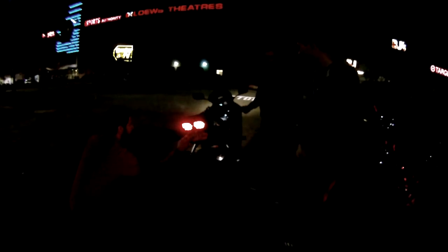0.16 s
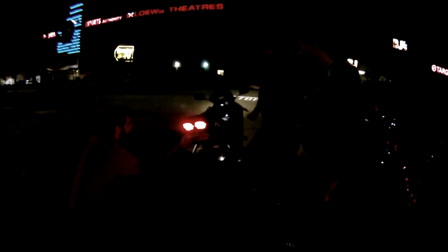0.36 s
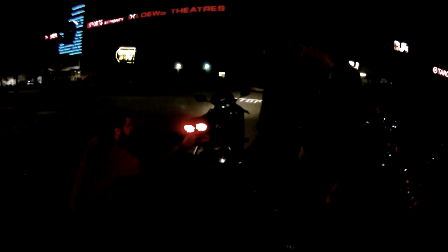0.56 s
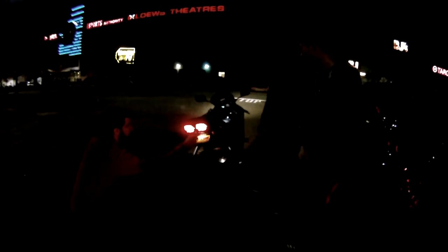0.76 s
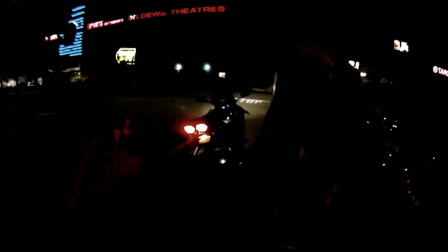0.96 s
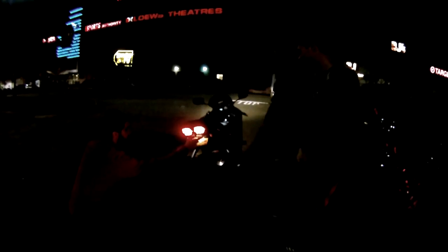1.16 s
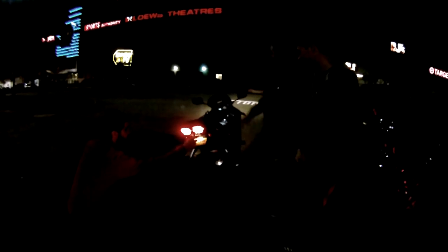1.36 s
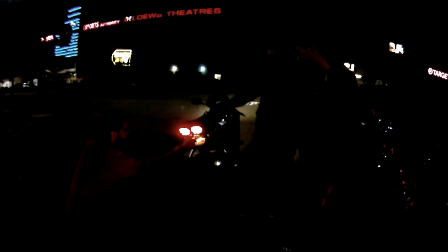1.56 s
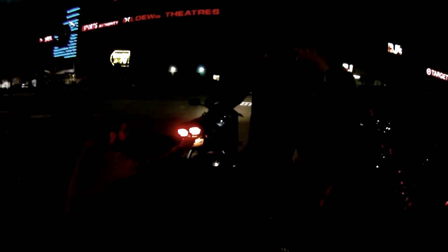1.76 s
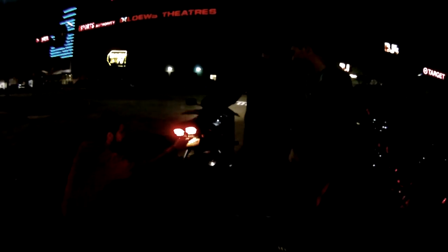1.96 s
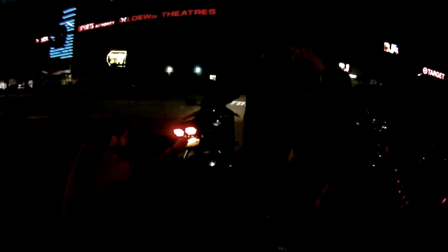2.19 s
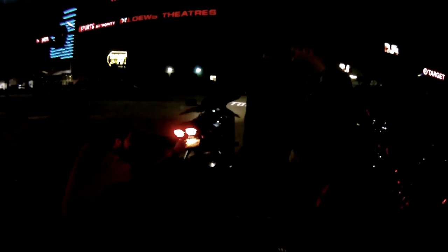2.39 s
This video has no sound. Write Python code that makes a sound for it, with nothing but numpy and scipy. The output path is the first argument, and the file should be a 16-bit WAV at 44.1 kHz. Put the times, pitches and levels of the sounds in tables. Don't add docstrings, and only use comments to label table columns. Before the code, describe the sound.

Motorcycle engines idling in an open car park at night, lumpy and popping, with brief switch clicks

```python
import sys
import numpy as np
from scipy import signal
from scipy.fft import rfft, irfft
from scipy.io import wavfile

SR = 44100
rng = np.random.default_rng(int(sys.argv[2]) if len(sys.argv) > 2 else 0)


def master(y):
    cut = np.clip(np.atleast_2d(y).T, -1, 1)
    pcm = np.round(cut * 32767)
    wavfile.write(sys.argv[1], SR, pcm.astype(np.int16))


def to_linear_factor(level_db):
    exponent = np.asarray(level_db, float) / 20
    return 10 ** exponent


N = 111573


def rms_one(x):
    return x / np.sqrt(np.mean(x ** 2) + 1e-20)


def noise():
    return rng.standard_normal(N)


def drift(rate_hz):
    r = np.exp(-2 * np.pi * rate_hz / SR)
    wander = signal.lfilter([1], [1, -2 * r, r * r], rng.standard_normal(N + SR))
    return rms_one(wander[SR:])


def train(times_s, level_db):
    out = np.full(N, 1e-18)
    place = np.clip((np.asarray(times_s) * SR).astype(int), 0, N - 1)
    np.add.at(out, place, to_linear_factor(np.asarray(level_db)))
    return out


def modes(knocks, table):
    out = 0
    for hz, db, t60_s in table:
        r, w = to_linear_factor(-60 / (t60_s * SR)), 2 * np.pi * hz / SR
        out = out + to_linear_factor(db) * signal.lfilter([0, np.sin(w)], [1, -2 * r * np.cos(w), r * r], knocks)
    return out


def resonance(x, hz, width_hz):
    r = np.exp(-np.pi * width_hz / SR)
    gain = (1 - r * r) / 2
    return signal.lfilter([gain, 0, -gain], [1, -2 * r * np.cos(2 * np.pi * hz / SR), r * r], x)


def coloured(spectrum):
    hz, db = np.transpose(spectrum)
    grid = np.fft.rfftfreq(N, 1 / SR) + 1
    gain = to_linear_factor(np.interp(np.log(grid), np.log(hz), db))
    return rms_one(irfft(rfft(noise()) * gain, N))


def puffs(knocks, decay_s):
    return signal.lfilter([1], [1, -np.exp(-1 / (decay_s * SR))], knocks)


def filtered(x, order, hz, kind="low"):
    return signal.sosfilt(signal.butter(order, hz, kind, fs=SR, output="sos"), x)


# columns f/Hz, level/dB per Hz
RUMBLE_SPECTRUM = [(20, -42), (35, -33), (60, 3), (130, -2), (200, -20.5), (420, -19.5), (560, -39.5),
                   (800, -41)]


def traffic():
    return to_linear_factor(-42.5) * coloured(RUMBLE_SPECTRUM)


# columns f/Hz, level/dB per Hz
HISS_SPECTRUM = [(310, -29), (520, -9), (1090, -5.5), (1440, -12), (2140, -2), (4910, -14), (5900, -22),
                 (7670, -69), (13000, -120)]
# columns f/Hz, width/Hz, level/dB
HISS_PEAKS = [(2134, 146, -51.5), (1898, 200, -55.5), (2476, 116, -57.5), (3405, 52, -66),
              (3740, 50, -68.5)]


def hiss(rasp, chuff):
    hiss_db = -53
    out = coloured(HISS_SPECTRUM) * to_linear_factor(0.4 * drift(27))
    for hz, width_hz, db in HISS_PEAKS:
        narrow = resonance(resonance(noise(), hz, width_hz), hz, 2 * width_hz)
        out = out + to_linear_factor(db - hiss_db + 2.0 * drift(38)) * rms_one(narrow)
    steady = to_linear_factor(hiss_db + 1.3 * drift(45))
    return out * np.sqrt(steady ** 2 + rasp ** 2 + chuff ** 2)


# t/s, length/s, level/dB, f/Hz
HAND_BRUSH = (.82, .16, -61, 1400)


def brush():
    start_s, length_s, db, hz = HAND_BRUSH
    progress = np.clip((np.arange(N) / SR - start_s) / length_s, 0, 1)
    rub = resonance(resonance(noise(), hz, 410), hz, 690)
    return to_linear_factor(db) * np.sin(np.pi * progress) * rms_one(rub)


# columns t/s, level/dB, f/Hz, rise/s
SWITCH_CLICKS = [(.9150, -31, 2200, .002), (.9190, -23, 2200, .0008), (.9196, -27.5, 3500, .0009),
                 (.9500, -38, 2200, .002), (1.1010, -32.5, 2150, .001), (1.1335, -31.5, 2150, .002),
                 (1.1532, -29, 1450, .00035), (1.1534, -32, 2300, .0004), (1.1728, -30, 1450, .00035),
                 (1.1733, -33, 2400, .0005), (1.439, -37, 2300, .0012)]
# columns f/Hz, level/dB, t60/s
HOUSING = [(1250, -38, .03), (1700, -27, .016), (2550, -29, .016), (3300, -33, .035), (3750, -34, .035)]


def switch():
    out, t = 0, np.arange(N) / SR
    for start_s, db, hz, rise_s in SWITCH_CLICKS:
        u = np.clip((t - start_s) / rise_s, 0, 40)
        tone = np.sin(2 * np.pi * hz * (t - start_s))
        grit = rms_one(resonance(noise(), hz, hz))
        out = out + to_linear_factor(db) * u * np.exp(1 - u) * (tone + 0.35 * grit)
    loudest_s, snap_s, second_snap_s = SWITCH_CLICKS[1][0] + .001, SWITCH_CLICKS[6][0], SWITCH_CLICKS[8][0]
    out = out + modes(train([loudest_s, snap_s, second_snap_s], [0, -14, -13]), HOUSING)
    return filtered(out, 3, [800, 4300], "band")


# columns t/s, level/dB
VALVE_TICKS = [(0.075, -45), (0.162, -47), (0.253, -40), (0.339, -46), (0.431, -41), (0.53, -43),
               (0.622, -41), (0.718, -43), (0.816, -41), (0.912, -42), (1.003, -43), (1.098, -42),
               (1.186, -43), (1.281, -39.5), (1.37, -43.5), (1.461, -40.5), (1.551, -47), (1.645, -41),
               (1.739, -42.5), (1.835, -40.5), (1.931, -43), (2.029, -42), (2.129, -42), (2.224, -39.5),
               (2.318, -42.5), (2.416, -39.5), (2.507, -43)]
# columns f/Hz, level/dB, t60/s
VALVE_COVER = [
    (964, -7, 0.046),
    (1062.5, -3.5, 0.034),
    (1199, -10, 0.074),
]
# columns f/Hz, level/dB, t60/s
TWIN_PIPE = [
    (55, -34.5, 0.059),
    (92, -54, .1),
    (125.5, -40, 0.14),
    (177.3, -50.5, 0.48),
    (214.9, -55, 0.26),
]
# columns t/s, level/dB
HARD_FIRINGS = [
    (0.111, 2.5),
    (.292, 2),
    (0.758, -2),
    (0.952, 2),
    (1.319, 2),
    (1.687, 3),
    (1.876, 1),
    (2.069, -2),
    (2.454, 4),
]


def twin():
    second_firing, second_db, spread_db = 0.41, -3, 1
    ticks_s, tick_db = np.transpose(VALVE_TICKS)
    cycle_s = np.gradient(ticks_s)
    before_s = ticks_s[:1] - (1 - second_firing) * cycle_s[0]
    times = np.concatenate([ticks_s, ticks_s + second_firing * cycle_s, before_s])
    is_second = np.arange(len(times)) >= len(ticks_s)
    power_db = second_db * is_second + spread_db * rng.standard_normal(len(times))
    inside = times < N / SR
    hard = train(*np.transpose(HARD_FIRINGS))
    fire = train(times[inside], power_db[inside]) + 0.5 * hard

    spit_swell = puffs(puffs(hard, 0.0065), 0.0035) / (0.0012 * SR)
    spit = to_linear_factor(-59) * spit_swell * rms_one(resonance(noise(), 4600, 3800))
    tick = 0
    for mode in VALVE_COVER:
        strike_s = ticks_s + rng.uniform(0, .0004, len(ticks_s))
        strike_db = tick_db + rng.normal(0, 1, len(ticks_s))
        tick = tick + modes(train(strike_s, strike_db), [mode])
    tick = to_linear_factor(-0.5) * resonance(tick, 1005, 480)
    exhaust = filtered(modes(fire, TWIN_PIPE), 2, 400)
    return exhaust + spit + tick, to_linear_factor(-62.5) * puffs(fire, 0.004)


# columns t/s, f/Hz
FOUR_SPEED = [(0.0, 64.56), (0.195, 69.01), (0.389, 69.97), (0.584, 71.34), (0.778, 73.75), (0.973, 72.72),
              (1.168, 74.83), (1.362, 73.4), (1.557, 72.6), (1.752, 74.78), (1.946, 76.39), (2.141, 75.84),
              (2.335, 74.84), (2.53, 76.42)]
# columns level/dB, spread/dB
CYLINDERS = [
    (-1.5, 1.5),
    (0, 1.2),
    (-1.5, 1.3),
    (-15, 3),
]
# columns f/Hz, level/dB, t60/s
FOUR_PIPE = [
    (79, -45.5, 0.038),
    (139.2, -43.5, 0.088),
    (296.7, -41.5, 0.057),
    (356, -40.5, 0.022),
    (439.4, -48.5, 0.044),
]
CATCHES = [0.161, 0.277, 0.449, 0.618, 0.783, 0.892, 1.056, 1.164, 1.271, 1.435, 1.599, 1.762, 1.92, 1.973,
           2.396, 2.449]
MISFIRES = [.058, .176, .292, .435, .52, .604, .632, .715, .824, .933, .974, 1.015, 1.043, 1.151, 1.285,
            1.394, 1.503, 1.613, 1.721, 1.881, 1.986, 2.091, 2.17, 2.197, 2.303, 2.515]


def four():
    jitter_s, catch_db, misfire_db = 0.00024, 16, -13
    t = np.arange(N) / SR
    phase = 0.28 + np.cumsum(np.interp(t, *np.transpose(FOUR_SPEED))) / SR
    k = np.arange(1, int(phase[-1]) + 1)
    fire_s = np.interp(k, phase, t)
    luck = rng.standard_normal((len(k), 2))
    level_db, spread_db = np.array(CYLINDERS)[k % 4].T
    for times, change_db in (CATCHES, catch_db), (MISFIRES, misfire_db):
        nearest = np.abs(fire_s - np.reshape(times, (-1, 1))).argmin(axis=1)
        level_db = level_db + change_db * np.isin(k, k[nearest])
    fire = train(fire_s + jitter_s * luck[:, 0], level_db + spread_db * luck[:, 1])
    hum = to_linear_factor(-48 + 2.2 * drift(12)) * np.sqrt(2) * np.sin(2 * np.pi * phase)
    exhaust = filtered(modes(fire, FOUR_PIPE), 6, 481.5)
    return exhaust + hum, to_linear_factor(-82) * rms_one(puffs(fire, 0.0046))


def scene():
    near, rasp = four()
    far, chuff = twin()
    return (traffic() + hiss(rasp, chuff) + brush() + switch() + far + near)[None]


# columns f/Hz, level/dB
TOP_CUT = [
    (15270, 0),
    (15320, -27),
    (16000, -40),
    (16300, -44),
]


def camera(dry):
    hold_hz = 12000
    x = filtered(dry, 18, 5650)
    x = filtered(x, 3, 28, "high")
    sampled = x * (1 + 2 * np.cos(2 * np.pi * hold_hz * np.arange(N) / SR))
    hz = np.fft.rfftfreq(N, 1 / SR)
    droop = np.sinc(hz / hold_hz) * to_linear_factor(np.interp(hz, *np.transpose(TOP_CUT)))
    return irfft(rfft(sampled) * droop, N)


def top_cut(x):
    return signal.sosfilt(signal.butter(12, 16130, fs=SR, output="sos"), x)


def record(dry):
    mix = camera(dry)
    return top_cut(mix)


dry = scene()
out = record(dry)
master(out)
```